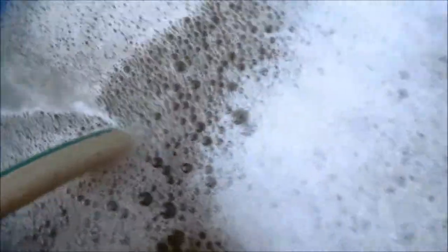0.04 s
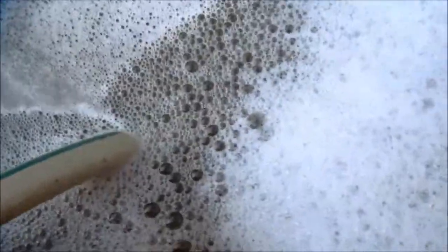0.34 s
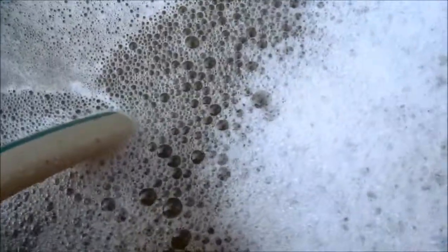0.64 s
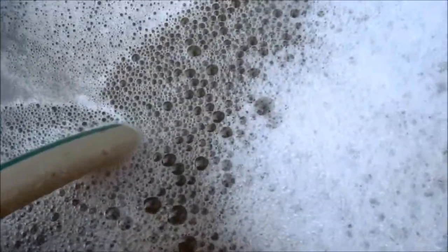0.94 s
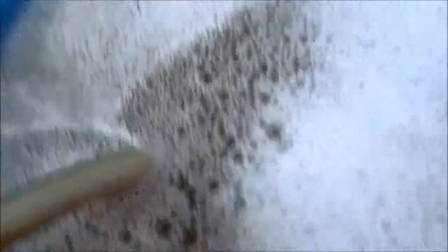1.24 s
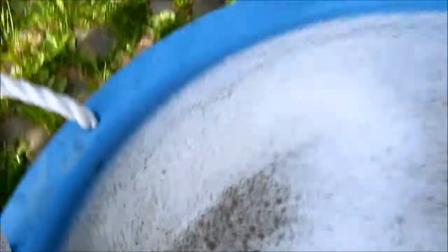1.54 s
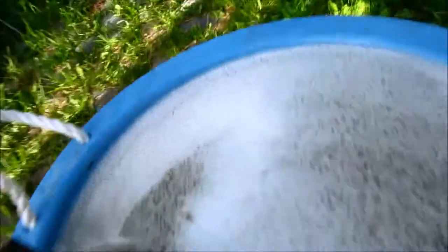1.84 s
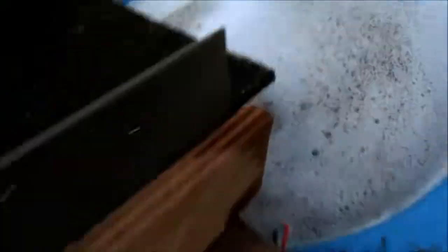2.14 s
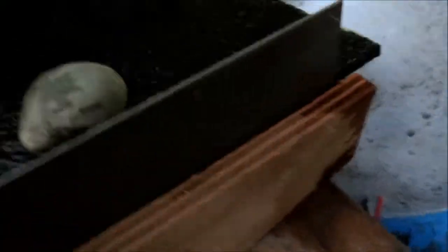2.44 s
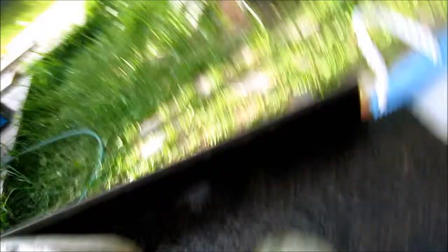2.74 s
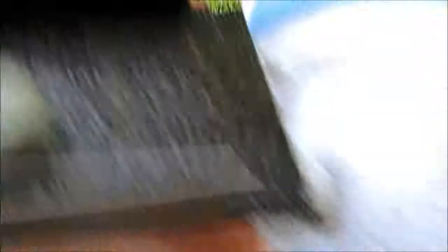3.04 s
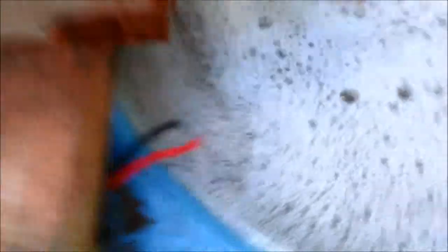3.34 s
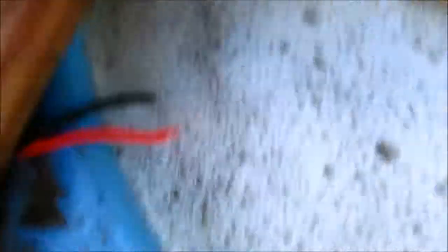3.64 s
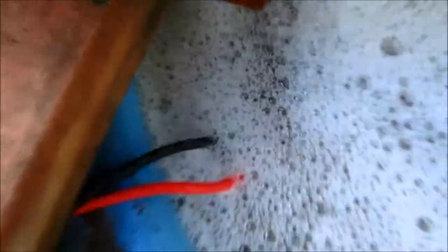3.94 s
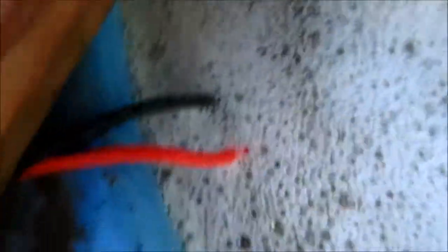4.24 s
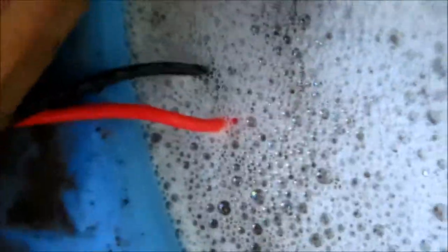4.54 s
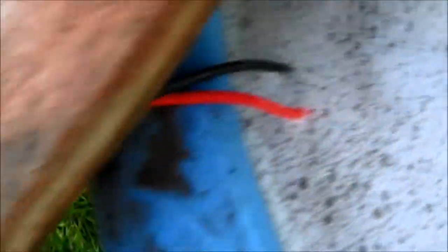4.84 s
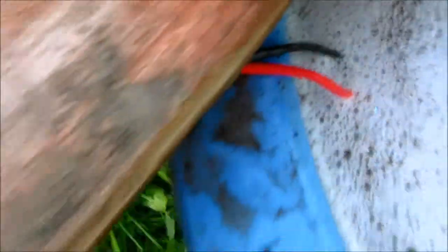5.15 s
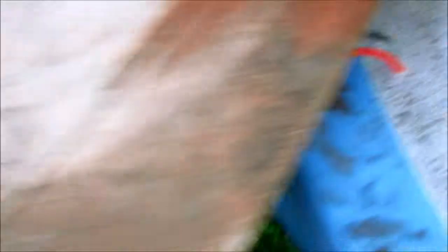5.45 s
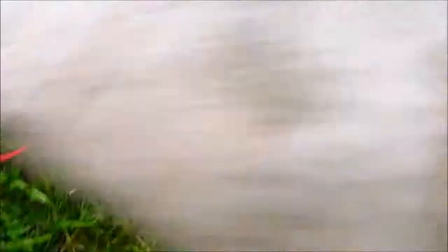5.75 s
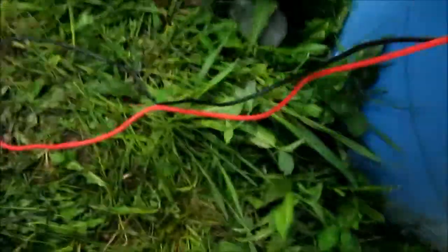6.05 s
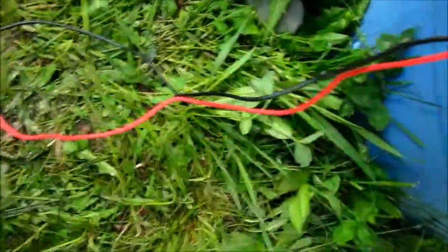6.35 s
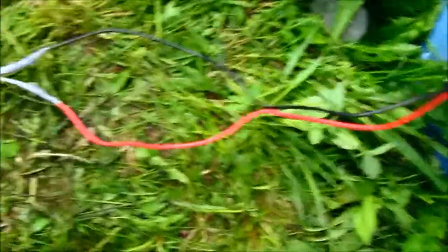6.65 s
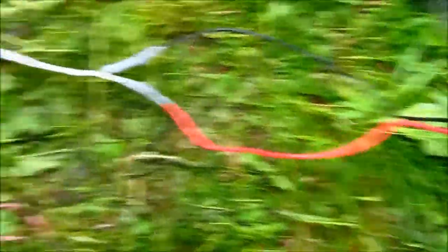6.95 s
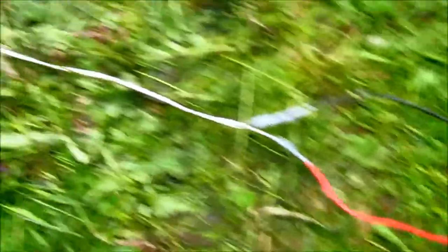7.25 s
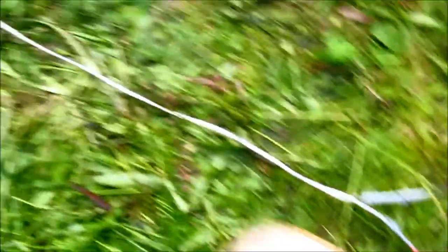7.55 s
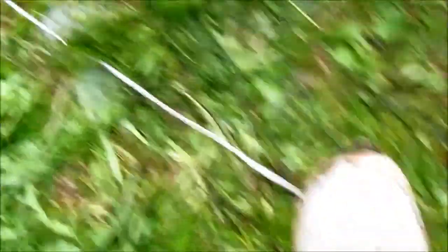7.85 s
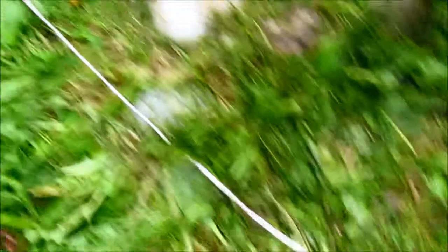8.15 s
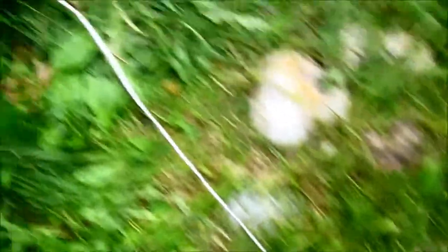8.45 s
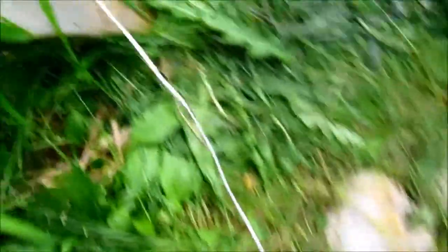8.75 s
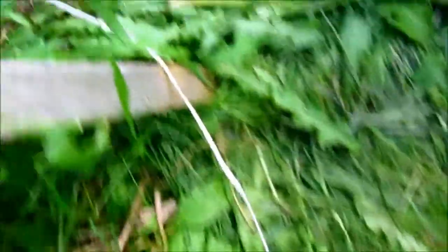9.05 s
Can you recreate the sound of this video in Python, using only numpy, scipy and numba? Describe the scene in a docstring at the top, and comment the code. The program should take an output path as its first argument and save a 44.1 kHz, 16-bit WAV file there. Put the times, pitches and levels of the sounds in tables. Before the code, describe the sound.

Water splashes from a hose into a tub with popping bubbles, growing faint before a few soft steps on a lawn.

```python
"""A hose filling a tub

A jet runs into a foamy plastic tub on a lawn and beats air into the water. Each bubble is an oscillator,
its air the spring and the water the mass: small ones ring high and burst, big ones plop, and gulps of air
set the tub booming softly. The spray changes colour as the listener moves round the tub, then fades as
the listener backs away through rustling grass."""
import sys
import numpy as np
from scipy import signal
from scipy.io import wavfile
from scipy.ndimage import uniform_filter1d
from numba import njit

SR = 44100
rng = np.random.default_rng(int(sys.argv[2]) if len(sys.argv) > 2 else 0)


def log_audio(samples):
    """Write samples as a 16-bit WAV file to the path given in sys.argv[1]."""
    # one column per channel
    frames = np.atleast_2d(samples).T
    # limit to full scale, then quantise
    limited = np.clip(frames, -1, 1)
    pcm = np.round(limited * 32767).astype(np.int16)
    wavfile.write(sys.argv[1], SR, pcm)


N = 401751
CUTOFF_HZ = 15900
SMALL_RISE = 0.03   # fractional rise in pitch over a small bubble's life

# Levels in the tables are relative: each source adds its own gain or spectrum.
# the water's level as heard over time; the gain ducks just after the loudest pop:
# t/s, gurgle level/dB, spray level/dB, spray centre f/Hz
WATER_HEARD = [(0, -40.5, -39, 10300), (1.12, -40, -39, 9600), (1.145, -45.5, -42.5, 9600),
               (1.95, -48.5, -42.5, 9200), (2.3, -47, -40.5, 8300), (3.0, -48, -43, 9000),
               (3.18, -44.5, -35.5, 7360), (3.56, -40.5, -32.5, 5960), (4.55, -40, -35, 6600),
               (4.85, -48, -40, 7260), (5.35, -48.5, -40, 6150), (5.7, -51, -46, 8100),
               (6.1, -59, -60, 8600), (6.7, -57.5, -57, 7500), (6.9, -59.5, -49.5, 4700),
               (7.6, -56.5, -53.5, 3490), (8.3, -59.5, -45, 4760), (9.11, -51.5, -47.5, 6500)]
# texture of the water: t/s, spread of bubble levels/dB, share of hiss/1, depth of flutter and spitting/1
TEXTURE = [(0, 9.5, 0.19, 0.8), (2.3, 6.5, 0.21, 0.82), (3.5, 4, 0.14, 0.66), (5.8, 6, 0.15, 0.84),
           (7.2, 10, 0.85, 0.7), (8.5, 5.5, 0.45, 0.42)]
# the jet splashes harder: t/s, rise/dB
JET_SURGES = [(0.161, 7.5), (0.671, 4), (1.011, 13), (2.025, 11), (2.421, 13), (3.44, 7.5), (4.15, 7),
              (4.27, 6.5), (4.638, 8), (5.178, 8), (5.246, 13)]
# spectrum of the gurgle: f/Hz, level/dB
GURGLE_SPECTRUM = [(200, -32.5), (400, 1.5), (730, -2), (1800, 0.5), (3000, 2), (5300, 1.5), (7000, -27),
                   (16000, -34)]
# spectrum of the foam's fizz: f/Hz, level/dB
FIZZ_SPECTRUM = [(1500, -3.5), (8000, 11.5), (12000, -2.5), (16000, -2)]
# the fizz, which carries only a short way, along the listener's path: t/s, level/dB
FIZZ_PATH = [(0, -50.5), (1.1, -56), (2.2, -62), (4.7, -71), (5.5, -66.5), (6.1, -77), (7.5, -96)]
# narrow resonances that colour the water; a thin ring near 4.4 kHz sounds toward the end:
# f/Hz, width/Hz, added level/dB, loudest at t/s, half-span/s
NARROW_RESONANCES = [(741, 56, 3, 4.77, 1.5), (3000, 650, -2.5, 3.57, 0.67), (3430, 460, -1, 4.78, 0.43),
                     (5420, 470, -1, 4.95, 1.1), (6400, 520, -3, 5.5, 0.77), (9500, 1000, 4, 6.17, 0.37),
                     (4380, 260, 0, 9.4, 1.2)]
# the band cancelled by a reflection off the ground or the tub's rim: t/s, f/Hz, depth/1
NOTCH_PATH = [(0, 7300, 0), (3.6, 4370, 0.02), (4.65, 4200, 0.63), (4.95, 5450, 0.53), (6.2, 6250, 0.34),
              (9.1, 6790, 0.23)]
# modes of the air in the tub: f/Hz, half-width/Hz, level/dB
TUB_MODES = [(346.4, 24, 0.5), (395, 140, -8.5), (722, 26, -13)]
# spectrum of outdoor air: f/Hz, level/dB
AIR_SPECTRUM = [(25, -56.5), (80, -67), (240, -83), (450, -61), (1000, -64.5), (7000, -70.5), (16000, -91)]
# spectrum of the rumble of walking: f/Hz, level/dB
RUMBLE_SPECTRUM = [(25, -61), (140, -58), (400, -60.5), (1000, -66.5), (16000, -130)]
# that rumble along the path: t/s, level/dB
RUMBLE_PATH = [(0, 1.5), (2.7, 3.5), (3.15, 10.5), (4.3, 2), (6.3, 5), (8.0, 10.5), (9.1, 13)]
# bands of a faint drone: f/Hz, half-width/Hz, level/dB
DRONE_BANDS = [(121.2, 6.7, -73), (235, 14, -60.5), (411, 30, -60.5)]
# gulps of air: t/s, level/dB
AIR_GULPS = [(0.029, -28), (0.209, -29), (0.357, -26), (0.412, -26), (0.501, -23.5), (1.009, -29),
             (1.592, -26), (2.606, -28)]
# big bubbles: t/s, f/Hz, level/dB
BIG_BUBBLES = [(0.053, 1120, -22.5), (0.587, 1850, -15), (0.74, 1610, -16), (0.814, 950, -23.5),
               (1.038, 910, -24.5), (1.418, 936, -20), (1.533, 1690, -13.5), (1.726, 790, -30.5),
               (2.693, 3560, -11.5), (2.902, 552, -29.5), (3.324, 698, -29), (3.8073, 3060, -9),
               (3.838, 764, -25.5), (3.911, 930, -22), (3.936, 1810, -14.5), (4.142, 3360, -10),
               (4.156, 973, -18), (4.456, 784, -27), (5.05, 1145, -25.5), (5.203, 770, -30),
               (5.473, 1230, -27.5), (5.739, 1330, -35), (5.798, 1100, -34.5), (6.826, 506, -35),
               (7.083, 800, -34), (7.329, 594, -31.5), (7.375, 1380, -31), (8.016, 1006, -29)]
# the loudest bursts at the surface: t/s, f/Hz, level/dB
SURFACE_POPS = [(0.1577, 9000, -3), (0.1605, 6800, -4.5), (0.226, 7100, 0.5), (0.419, 9200, -6.5),
                (0.5285, 10500, -0.5), (0.6793, 9100, 5.5), (0.7135, 10900, -3), (0.9494, 4350, -2.5),
                (1.128, 9700, 8), (1.1304, 7300, -2), (1.2682, 4800, -11), (1.3664, 9070, -6.5),
                (1.4184, 3620, -10.5), (1.5328, 9700, 2), (1.773, 8500, -3), (2.0202, 10300, -6),
                (2.534, 9900, -4), (2.7123, 9800, -3), (2.9026, 8700, -1), (3.1315, 7900, -2.5),
                (3.1717, 8300, 0), (3.2104, 7800, 1), (3.3504, 7600, -2.5), (3.6904, 6760, 2),
                (3.7689, 6860, 0.5), (4.0113, 7100, -1.5), (4.3295, 5300, 1), (4.5872, 5900, -0.5),
                (4.609, 6340, 1), (4.707, 6400, -1), (4.7315, 7000, 1), (4.898, 7100, -2),
                (4.925, 7900, -8), (5.068, 6660, -1), (5.2347, 8140, 1), (5.6202, 8100, -8.5)]
# drops falling back: t/s, f/Hz, level/dB
FALLING_DROPS = [(1.2683, 4070, -13), (2.2938, 8600, -4), (5.183, 3350, -23), (6.946, 3800, -26),
                 (7.054, 4470, -27), (8.137, 3590, -23.5)]
# air pockets dragged down by the jet: t/s, level/dB
AIR_POCKETS = [(3.269, -28), (3.297, -27.5), (3.324, -22.5), (3.509, -28), (3.646, -27), (3.764, -35.5),
               (3.94, -30.5), (3.989, -35), (4.153, -28.5), (4.199, -30), (4.266, -30), (4.361, -27.5),
               (4.387, -26.5), (4.455, -30), (4.636, -27.5), (4.757, -31.5), (5.172, -30.5)]
# grass brushed by a step: t/s, level/dB, decay time/s, snapping blades' f/Hz
GRASS_STROKES = [(7.781, -54, 0.029, 3430), (8.351, -44, 0.062, 4130), (8.45, -45, 0.031, 6700),
                 (8.52, -51, 0.11, 5330), (8.941, -46.5, 0.0079, 5280)]
# spectrum of the grass's swish: f/Hz, level/dB
GRASS_SPECTRUM = [(150, 4), (400, 5), (2000, 5.5), (5800, 7), (9000, -7), (15000, -26)]
# stems snapping under the shoe: t/s, level/dB
STEM_SNAPS = [(7.993, -47), (8.149, -46.5), (8.289, -42), (8.385, -49), (8.592, -35), (8.625, -36.5),
              (8.641, -38.5)]
# the shoe meets the soil: t/s, level/dB
SHOE_IMPACTS = [(8.362, -33.5), (8.64, -33)]
# modes of the shoe's thud: f/Hz, t60/s, level/dB
THUD_MODES = [(128, 0.076, 0), (378, 0.032, 6)]


def from_db(db):
    """Amplitude ratio of a level in decibels."""
    return 10 ** (np.asarray(db) / 20)


def unit_rms(x):
    """Normalisation to unit power."""
    return x / np.sqrt(np.mean(x ** 2) + 1e-20)


def at_time(rows, t):
    """Linear interpolation of a table's columns at times t."""
    times, *columns = np.transpose(rows)
    return [np.interp(t, times, column) for column in columns]


def at_hz(spectrum, hz):
    """Level of a spectrum, interpolated in log frequency."""
    f, db = np.transpose(spectrum)
    return np.interp(np.log(hz), np.log(f), db)


def butterworth(x, order, hz, kind):
    """A filter with a maximally flat passband."""
    return signal.sosfilt(signal.butter(order, hz, kind, fs=SR, output="sos"), x + 1e-18)


def coloured(drives, gain_at, low_hz, count):
    """Spectral shaping: two drives feed alternate bands; unit power gives gain_at(t, hz) rms in 1 kHz."""
    edges, out = np.geomspace(low_hz, CUTOFF_HZ, count + 1), np.zeros(N)
    t = np.arange(N) / SR
    coarse = t[::100]
    for k, (low, high) in enumerate(zip(edges, edges[1:])):
        gain = np.broadcast_to(gain_at(coarse, np.sqrt(low * high)), coarse.shape)
        out += butterworth(drives[k % 2], 2, [low, high], "band") * np.interp(t, coarse, gain)
    return out * np.sqrt(SR / 2000)


def resonances(drive, modes):
    """Forced vibration: the responses of steep-skirted resonators superpose."""
    out = 0
    for hz, half_width_hz, db in modes:
        edges = [hz - half_width_hz, hz + half_width_hz]
        band = butterworth(drive, 1, edges, "band")
        out = out + from_db(db) * unit_rms(butterworth(band, 1, edges, "band"))
    return out


@njit
def swept_band(x, hz, width_hz):
    """A second-order resonator of unit peak gain and movable centre."""
    out, low, band = np.zeros(len(x)), 0.0, 0.0
    for i in range(len(x)):
        g, damping = np.tan(np.pi * hz[i] / SR), width_hz / hz[i]
        now = (band + g * (x[i] - low)) / (1 + g * (g + damping))
        band, low = 2 * now - band, low + 2 * g * now
        out[i] = damping * now
    return out


@njit
def damped_sines(start, hz, height, t60, rise, attack_cycles):
    """Free, damped vibration; rise is the fractional upward glide of a bubble nearing the surface."""
    out = np.zeros(N)
    for k in range(len(start)):
        first, length = int(start[k] * SR), int(t60[k] * SR) + 2
        fade, swell = np.exp(-np.log(1000) / length), np.exp(-hz[k] / SR / attack_cycles)
        size, closed, phase = height[k], 1.0, 0.0
        for i in range(min(length, N - first)):
            now_hz = hz[k] * (1 + rise[k] * (i / length - .1))
            phase += 2 * np.pi * min(now_hz, .45 * SR) / SR
            size *= fade
            closed *= swell
            out[first + i] += size * (1 - closed) * np.sin(phase)
    return out


def bubble_broods(rows, rise, attack_cycles, cycles, shed_db, scatter_s, octaves, count=4):
    """Fragmentation: each bubble rings together with a few weaker ones of nearby pitch."""
    s, hz, db = np.transpose(rows)[:, :, None]
    shed = np.arange(count) > 0
    delay, detune, climb = np.moveaxis(rng.uniform(-1.1, 1, (len(s), count, 3)), 2, 0)
    start = (s + shed * scatter_s * (delay + .5)).ravel()
    pitch = (hz * 2 ** (shed * octaves * detune)).ravel()
    height = from_db(db + shed * shed_db).ravel()
    return damped_sines(start, pitch, height, cycles / pitch, rise * (1 + climb.ravel()), attack_cycles)


def drift(corner_hz, hop=40):
    """Slow random fluctuation: low-passed noise of unit rms."""
    pole = np.exp(-2 * np.pi * corner_hz * hop / SR)
    slow = signal.lfilter([1], [1, -2 * pole, pole * pole], rng.standard_normal(N // hop + 2002))[2000:]
    return np.interp(np.arange(N) / hop, np.arange(len(slow)), unit_rms(slow))


def clumps(per_s, fade_s, steady, regularity=2.5, count=900):
    """Intermittency: decaying bursts at loosely even gaps add in power, over a steady floor; rms 1."""
    gap, size = rng.random((count, 2)).T
    at = (np.cumsum(-np.log(1 - gap) + regularity) / (1 + regularity) / per_s * SR).astype(int)
    births = np.bincount(at[at < N], from_db(-10 * size[at < N]), N)
    power = signal.lfilter([1], [1, -np.exp(-2 / (fade_s * SR))], births + 1e-18)
    return unit_rms(steady + np.sqrt(power))


def jet(t, unrest, rise_s=0.0024, fall_s=0.012, flutter_db=3.5):
    """Amplitude modulation by an unsteady jet: sudden surges over a flutter, with rms near 1."""
    db = flutter_db * unrest * drift(corner_hz=35)
    for s, rise_db in JET_SURGES:
        near = slice(*np.searchsorted(t, [s - .05, s + .05]))
        age = t[near] - s + rise_s
        db[near] += rise_db * np.exp(-.5 * (age / np.where(age < 0, rise_s, fall_s)) ** 2)
    strength = from_db(db)
    return strength / np.sqrt(uniform_filter1d(strength ** 2, size=SR // 3))


def water_colour(t, hz, crest_width_hz=600):
    """Incoherent sources add in power: broad gurgle, a crested hump of spray and the fizz of foam."""
    gurgle_db, spray_db, spray_hz = at_time(WATER_HEARD, t)
    fizz_db, = at_time(FIZZ_PATH, t)
    width_hz = 3000 * np.minimum(spray_hz / 5800, 1)   # a low hump is a narrower one
    hump = (1 + ((hz - spray_hz) / width_hz) ** 2) ** -2
    crest = 1 + 0.14 / (1 + ((hz - 1.2 * spray_hz) / crest_width_hz) ** 2)
    spray = from_db(spray_db - 0.5) * hump * crest
    gurgle = from_db(gurgle_db + at_hz(GURGLE_SPECTRUM, hz))
    fizz = from_db(fizz_db + at_hz(FIZZ_SPECTRUM, hz))
    return np.sqrt(gurgle ** 2 + spray ** 2 + fizz ** 2)


def small_bubbles(strength, glugs, spits, low_hz=450, big_hz=1100, tiny_hz=6500, count=19000):
    """Bubble resonance: smaller ones ring higher and die sooner. Big ones come in glugs, tiny in spits."""
    start, which = rng.random((count, 2)).T * [[(N - 1) / SR], [1]]
    size, damping, climb = np.clip(rng.standard_normal((3, count)), -1.96, 1.96)
    span = np.sqrt(CUTOFF_HZ) - np.sqrt(low_hz)
    hz = (np.sqrt(low_hz) + which * span) ** 2
    cycles = 28 * np.exp(.35 * damping)
    t60 = np.minimum(cycles / hz, 0.02)   # foam damps the big ones
    spread_db, hiss, _ = at_time(TEXTURE, start)
    spread_db = spread_db * np.where(hz > tiny_hz, 1, 0.65)   # more even below the fizz
    size = from_db(spread_db * size) / np.exp((np.log(10) * spread_db / 20) ** 2)
    # the bubbles of each pitch share that pitch's power between them
    per_s_khz = 1000 * count * SR / N / (2 * span * np.sqrt(hz))
    height = size * water_colour(start, hz) * np.sqrt(4 * np.log(1000) / (t60 * per_s_khz))
    at = (start * SR).astype(int)
    push = strength[at]
    height *= np.select([hz < big_hz, hz > tiny_hz], [np.sqrt(glugs[at] * push), spits[at] * push], push)
    height *= np.sqrt(1 - hiss) * rng.choice([-1, 1], count)
    return from_db(1.5) * damped_sines(start, hz, height, t60, SMALL_RISE * (1 + climb), 0.79)


def splash(t, strength, spits, ticks_per_s=140, tick_db=-10, hiss_db=0.5, spit_share=0.3):
    """Shot noise: droplets and bursting films tick over a hiss that swells with each spit."""
    hiss_share = at_time(TEXTURE, t)[1]
    ticks = (rng.random(N) < ticks_per_s / SR) * spits
    ticks *= from_db(1.5 * np.clip(rng.standard_normal(N), -2, 2))
    ticks = butterworth(ticks * rng.choice([-1, 1], N), 2, 6000, "high")
    hiss = from_db(hiss_db) * np.sqrt(hiss_share) * rng.standard_normal((2, N))
    hiss *= np.sqrt(1 - spit_share + spit_share * spits ** 2)
    drives = (from_db(tick_db) * unit_rms(ticks) * [[1], [-1]] + hiss) * strength
    return coloured(drives, water_colour, low_hz=329.6, count=27)


def gurgles(low_hz=480, high_hz=1650, cycles=30, follows=0.47, count=520):
    """Soft, low bubble resonances well up throughout; they carry farther than the spray."""
    start, which, size = rng.random((count, 3)).T * [[N / SR], [1], [1]]
    hz = low_hz + (high_hz - low_hz) * which
    gurgle_db = at_time(WATER_HEARD, start)[0]
    db = -45 + follows * (gurgle_db - gurgle_db.mean()) + 11 * size ** 2
    return damped_sines(start, hz, from_db(db), cycles / hz, np.full(count, 2 * SMALL_RISE), 0.35)


def peaks_and_notches(t, water, echo_s=0.000855, echo_gain=0.11):
    """Narrow resonances colour the water; by interference a rim echo ripples it, a reflection cuts it."""
    def near(s, half_span_s):
        return np.exp(-((t - s) / half_span_s) ** 4)
    rings = 0
    for hz, width_hz, db, s, half_span_s in NARROW_RESONANCES:
        ring = signal.lfilter(*signal.iirpeak(hz, hz / width_hz, fs=SR), water)
        rings = rings + from_db(db) * near(s, half_span_s) * ring
    rim_echo = echo_gain * near(3.6, 1.1) * np.interp(t - echo_s, t, water)
    heard = water + rings - rim_echo
    notch_hz, depth = at_time(NOTCH_PATH, t)
    heard = heard - depth * swept_band(heard, notch_hz, width_hz=1000)
    return butterworth(heard, 2, 280, "high")   # the small tub radiates little bass


def tub_boom(t, strength, knocks_per_s=300, churn=0.15, loud_gurgle_db=-35.5, follows=0.98):
    """Cavity resonance: churning water knocks on the air in the tub, which booms with the gurgle."""
    knocks = unit_rms((rng.random(N) < knocks_per_s / SR) * rng.standard_normal(N))
    drive = (knocks + churn * rng.standard_normal(N)) * strength
    gurgle_db = at_time(WATER_HEARD, t)[0]
    return from_db(-42.5 + follows * (gurgle_db - loud_gurgle_db)) * resonances(drive, TUB_MODES)


def garden(t, shelter_s=5.35, half_span_s=1.0, shelter_db=-4):
    """Ambient noise: air, walking rumble and a drone, all sheltered while the listener is low by the tub."""
    def gain_at(s, hz):
        rumble_db = at_hz(RUMBLE_SPECTRUM, hz) + at_time(RUMBLE_PATH, s)[0]
        return np.hypot(from_db(at_hz(AIR_SPECTRUM, hz)), from_db(rumble_db))
    air_and_rumble = coloured(rng.standard_normal((2, N)), gain_at, low_hz=19.6, count=15)
    drone = resonances(rng.standard_normal(N), DRONE_BANDS)
    shelter = from_db(shelter_db * np.exp(-((t - shelter_s) / half_span_s) ** 2))
    return shelter * (air_and_rumble + drone)


def gulps(gain_db=1, hz=333, t60_s=0.059, rise=0.02, detune=0.06):
    """Impulse response of a cavity: each gulp of air gives the tub one hollow, dying note."""
    s, db = np.transpose(AIR_GULPS)
    pitch = hz * (1 + detune * rng.uniform(-0.61, 1, len(s)))
    return damped_sines(s, pitch, from_db(db + gain_db), np.full_like(s, t60_s), np.full_like(s, rise), 0.72)


def plops():
    """Resonant frequency falls with size: big bubbles ring low and long."""
    return bubble_broods(BIG_BUBBLES, rise=0.045, attack_cycles=0.29, cycles=36,
                         shed_db=-14, scatter_s=0.017, octaves=0.5)


def pops():
    """Film rupture: a bubble bursts with its neighbours, and the little cavities ring, thin and brief."""
    rings = bubble_broods(SURFACE_POPS, rise=0.042, attack_cycles=0.2, cycles=13,
                          shed_db=-11, scatter_s=0.0014, octaves=0.5)
    return butterworth(rings, 1, 1500, "high")


def drips(gain_db=4.5):
    """Air entrainment: a falling drop traps one bubble and a few weaker ones, a short plink."""
    return from_db(gain_db) * bubble_broods(FALLING_DROPS, rise=0.05, attack_cycles=1.9, cycles=34,
                                            shed_db=-10, scatter_s=0.0023, octaves=0.23)


def sloshes(gain_db=-0.5, low_hz=330, high_hz=1020, scatter_s=0.0061, t60_s=0.031, count=5):
    """Heavy damping blurs pitch: an air pocket breaks into bubbles of mixed size, a splashy plop."""
    s, db = np.transpose(AIR_POCKETS)[:, :, None]
    delay, detune = np.moveaxis(rng.random((len(s), count, 2)), 2, 0)
    hz = low_hz + (high_hz - low_hz) * (np.arange(count) + detune - .5).clip(0) / count
    start = s + scatter_s * delay ** 2
    height = from_db(db + gain_db) * rng.choice([-1, 1], hz.shape)
    t60, rise = np.full(hz.size, t60_s), np.full(hz.size, SMALL_RISE)
    return damped_sines(start.ravel(), hz.ravel(), height.ravel(), t60, rise, 0.86)


def grass(t, swell_s=0.021, stem_s=0.00094, ring_hz=4520, ring_gain=0.82):
    """Friction noise: blades slip past a shoe and a few stems snap; the swish has a narrow ring."""
    envelope = np.zeros(N)
    for s, db, fade_s, _ in GRASS_STROKES:
        age = np.maximum(t - s, 0)
        envelope += from_db(db) * (1 - np.exp(-age / swell_s)) * np.exp(-age / fade_s)
    for s, db in STEM_SNAPS:
        envelope += from_db(db) * (t >= s) * np.exp(-np.abs(t - s) / stem_s)
    drives = envelope * rng.standard_normal((2, N))
    swish = coloured(drives, lambda s, hz: from_db(at_hz(GRASS_SPECTRUM, hz)), low_hz=90, count=12)
    return swish + ring_gain * swept_band(swish, np.full(N, ring_hz), width_hz=350)


def crunch(gain_db=20, spread_db=0.5, octaves=0.28, t60_s=0.0028, count=50):
    """Buckling: under each step single blades give way, each with a tiny pitched snap."""
    s, db, fade_s, hz = np.transpose(GRASS_STROKES)[:, :, None]
    size, detune = np.clip(rng.standard_normal((2, len(s), count)), -2, 2)
    start = (s + fade_s * rng.gamma(2, .5, size.shape)).ravel()
    pitch = (hz * 2 ** (octaves * detune)).ravel()
    height = from_db(db + gain_db + spread_db * size).ravel()
    return damped_sines(start, pitch, height, np.full_like(start, t60_s), np.zeros_like(start), 0.29)


def footfalls():
    """Impact excites damped modes: the shoe lands on soft ground with a dull knock."""
    modes = [(s, db + mode_db, hz, t60) for s, db in SHOE_IMPACTS for hz, t60, mode_db in THUD_MODES]
    s, db, hz, t60 = np.transpose(modes)
    return damped_sines(s, hz, from_db(db), t60, np.zeros_like(s), 0.31)


def scene():
    """Superposition: one jet drives bubbles, splash and tub; steps and outdoor air add to them."""
    t = np.arange(N) / SR
    unrest = at_time(TEXTURE, t)[2]
    strength = jet(t, unrest)
    glugs = clumps(per_s=26, fade_s=0.015, steady=0.037)
    spits = clumps(per_s=32, fade_s=0.0096, steady=0.014) ** unrest
    water = small_bubbles(strength, glugs, spits) + splash(t, strength, spits)
    water += pops() + plops() + sloshes() + gurgles() + drips()
    steps = grass(t) + crunch() + footfalls()
    boom = tub_boom(t, np.sqrt(strength * glugs)) + gulps()
    return (peaks_and_notches(t, water) + boom + steps + garden(t))[None]


def record(dry):
    """Clipping and band limiting: the sharpest pops hit full scale, and a steep low-pass cuts the top."""
    return signal.sosfilt(signal.ellip(10, .1, 70, CUTOFF_HZ, fs=SR, output="sos"), np.clip(dry, -1, 1))


dry = scene()
out = record(dry)
log_audio(out)
```